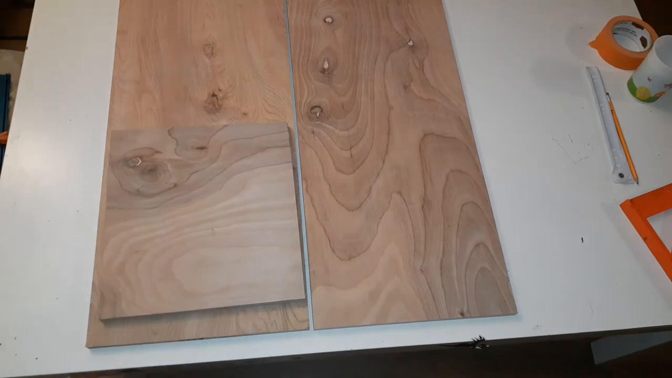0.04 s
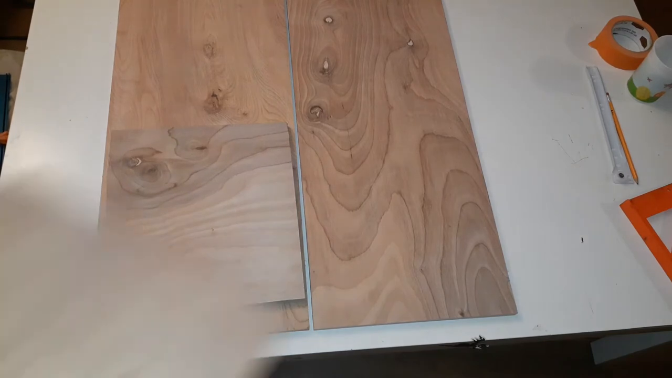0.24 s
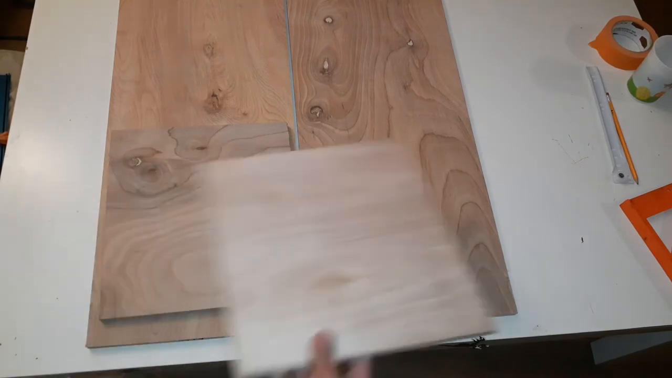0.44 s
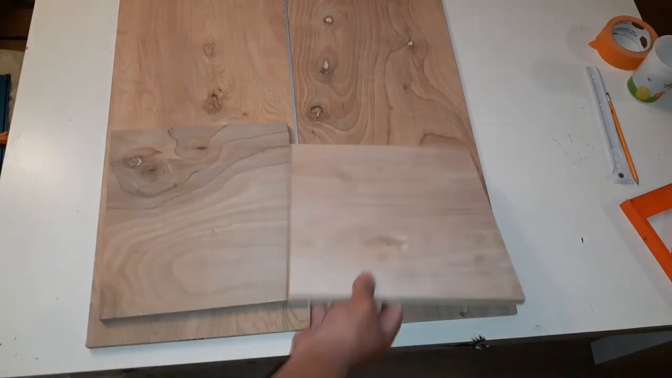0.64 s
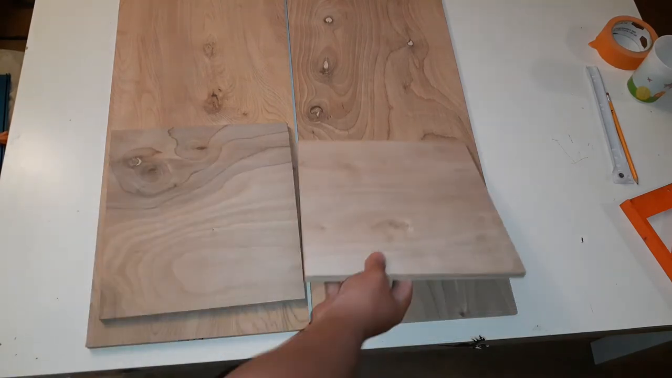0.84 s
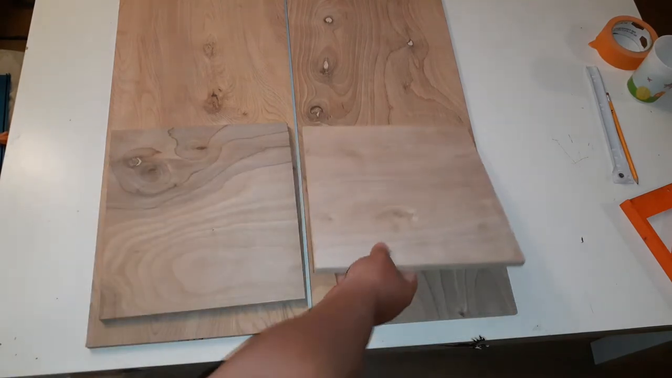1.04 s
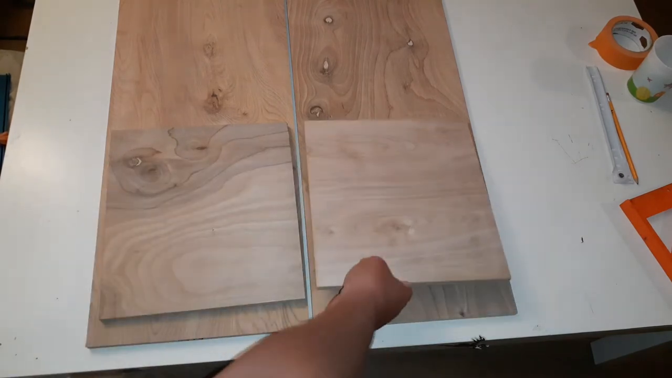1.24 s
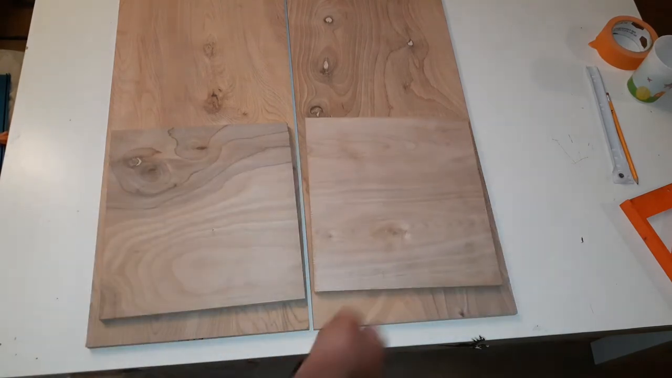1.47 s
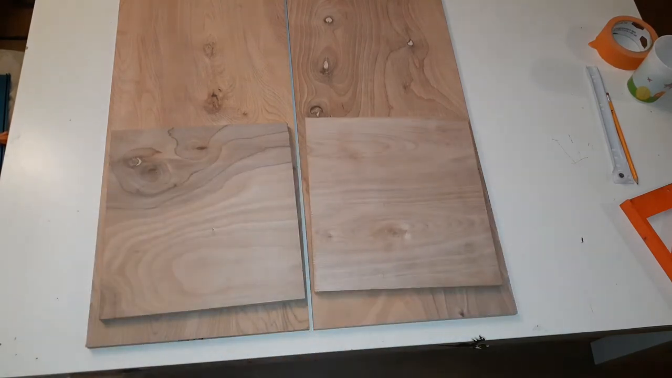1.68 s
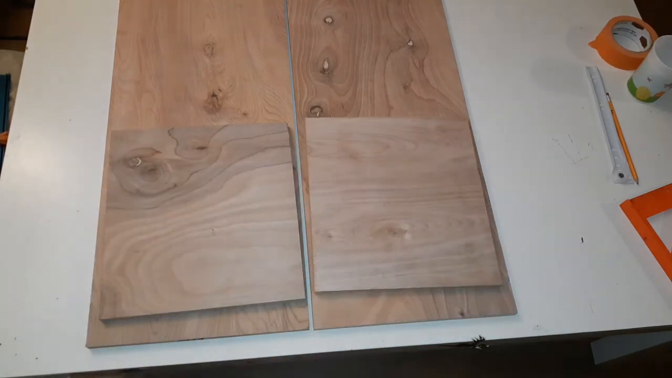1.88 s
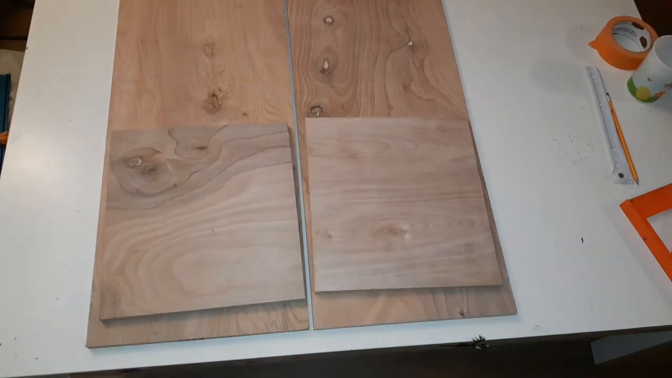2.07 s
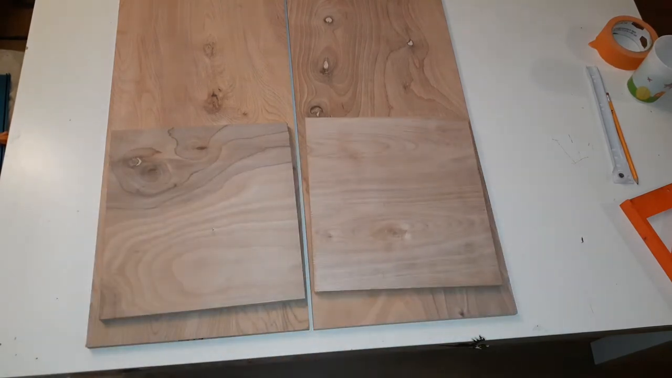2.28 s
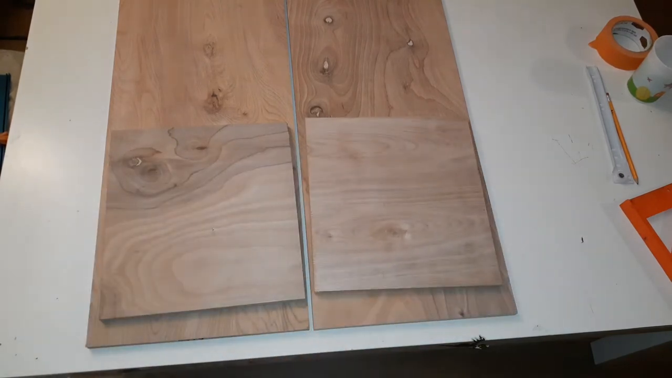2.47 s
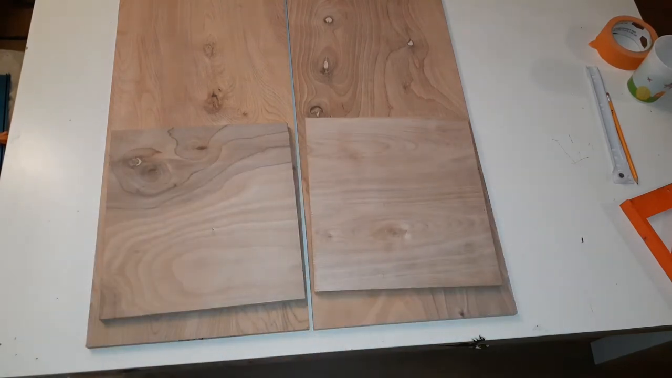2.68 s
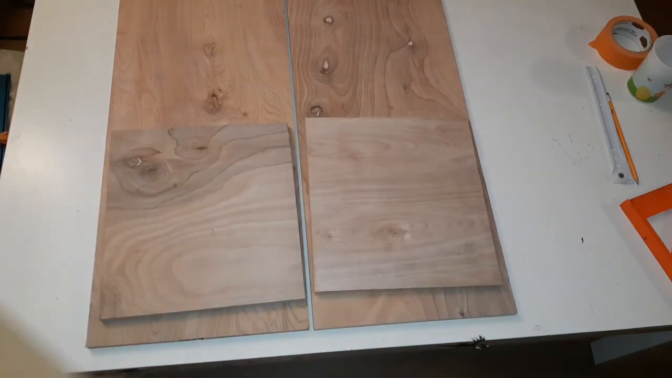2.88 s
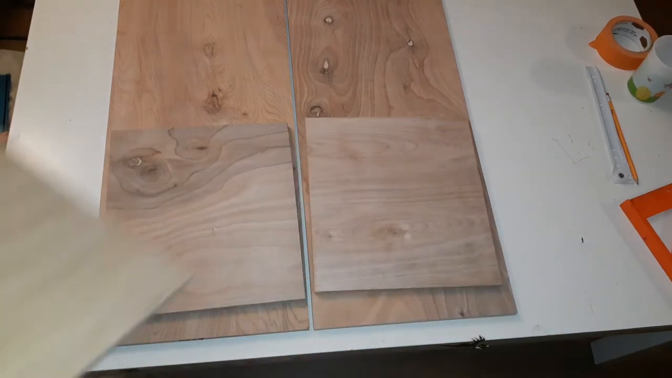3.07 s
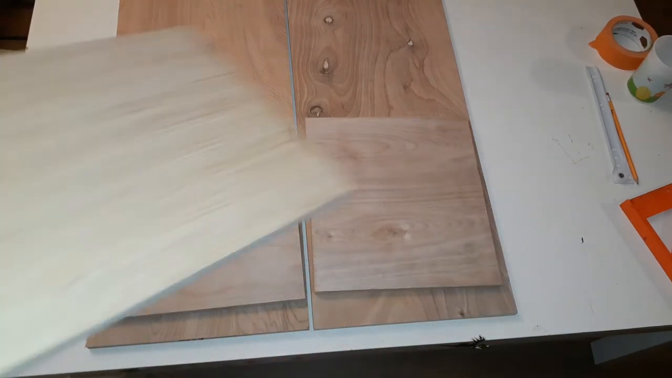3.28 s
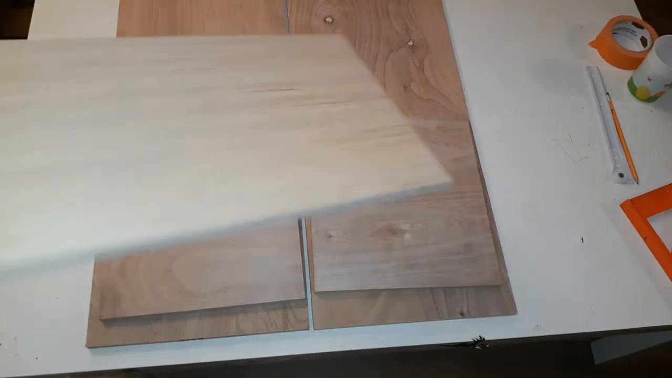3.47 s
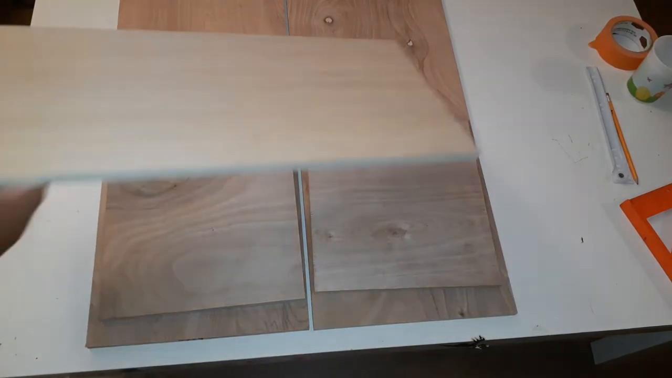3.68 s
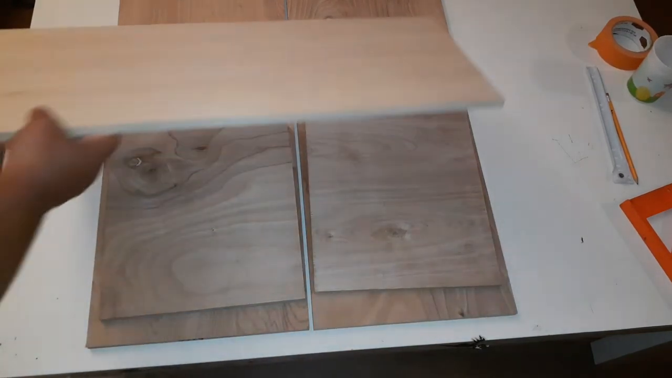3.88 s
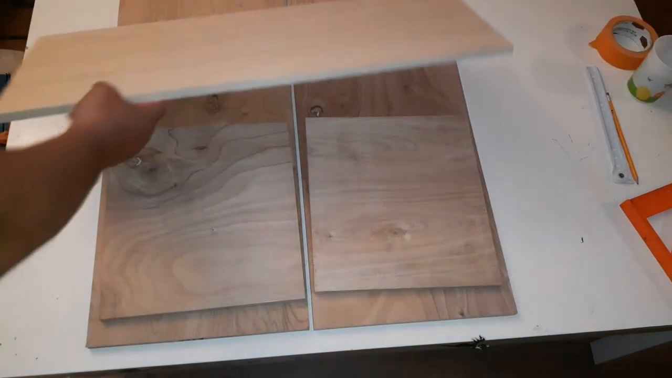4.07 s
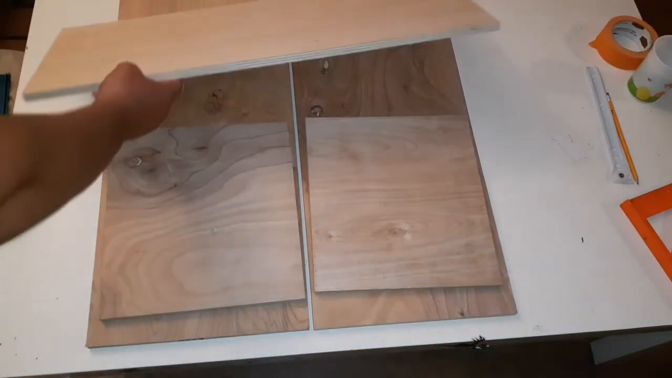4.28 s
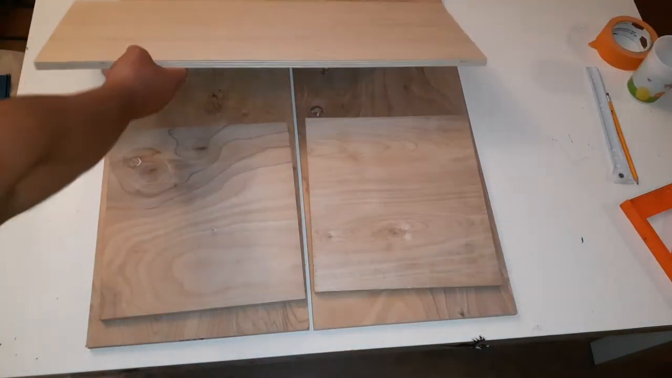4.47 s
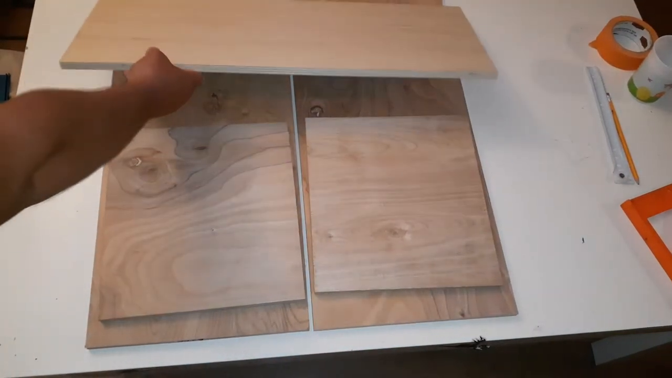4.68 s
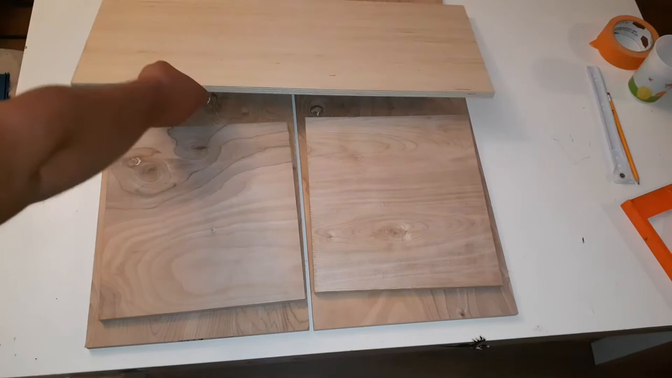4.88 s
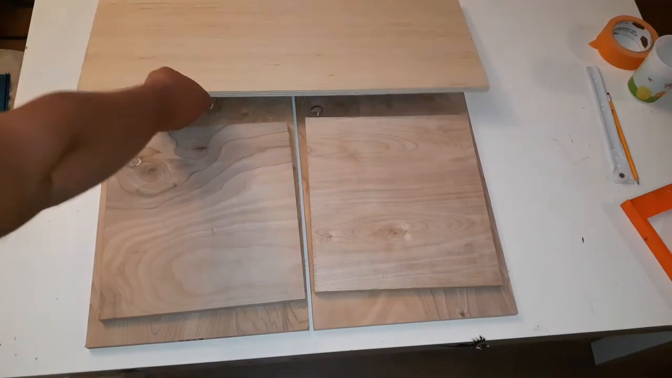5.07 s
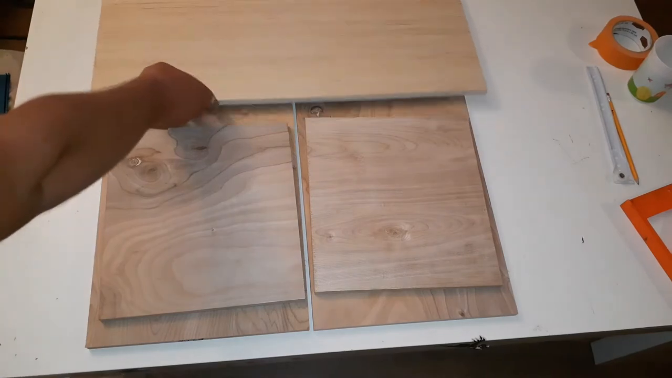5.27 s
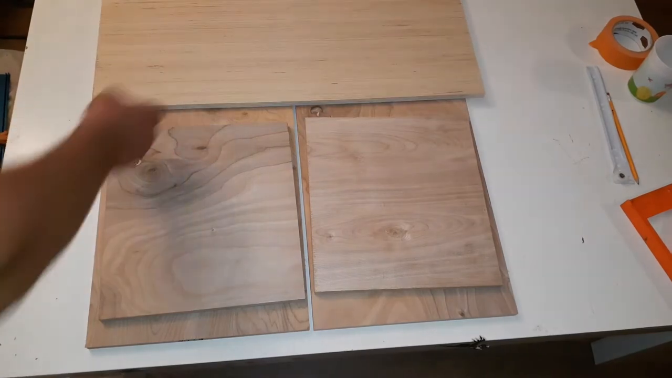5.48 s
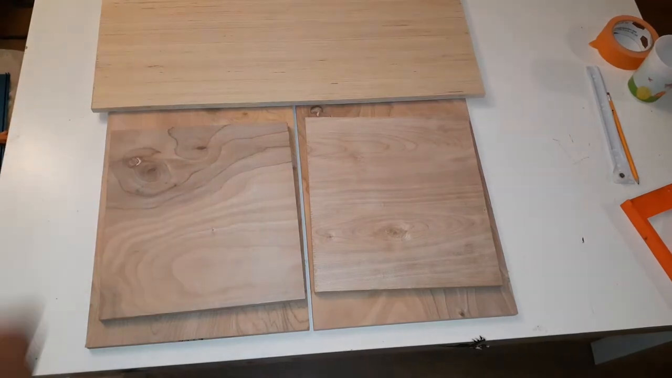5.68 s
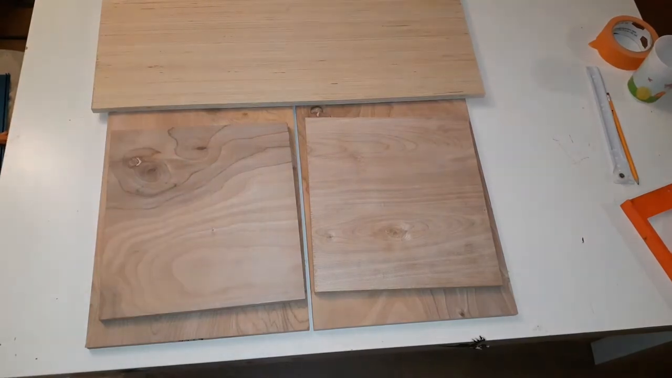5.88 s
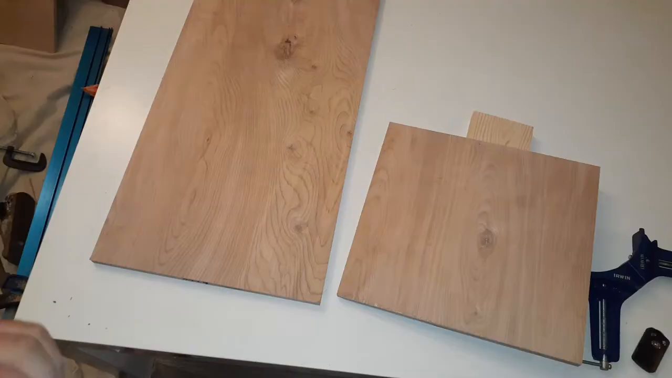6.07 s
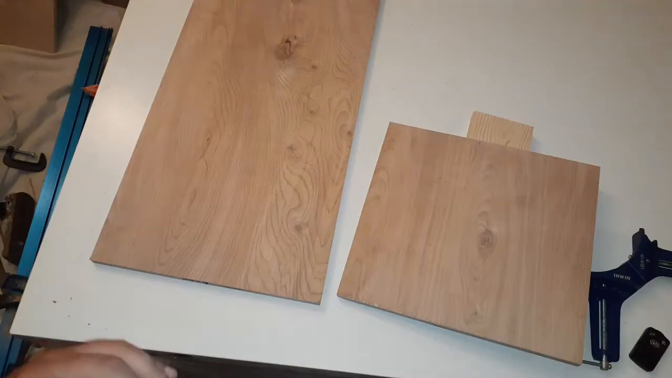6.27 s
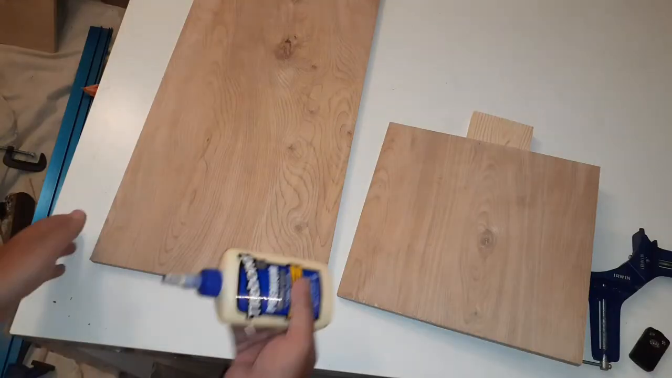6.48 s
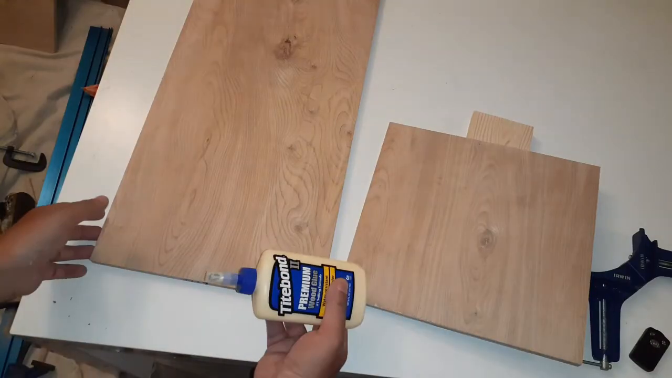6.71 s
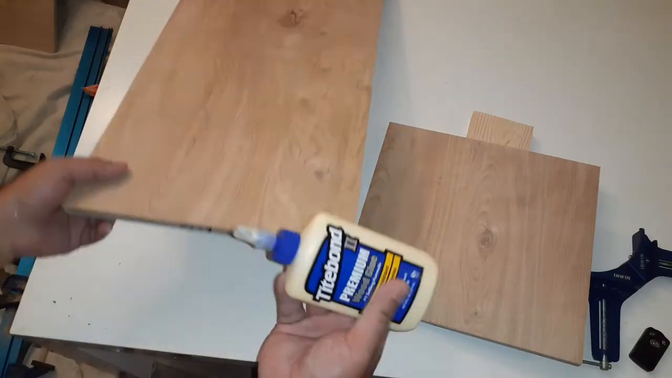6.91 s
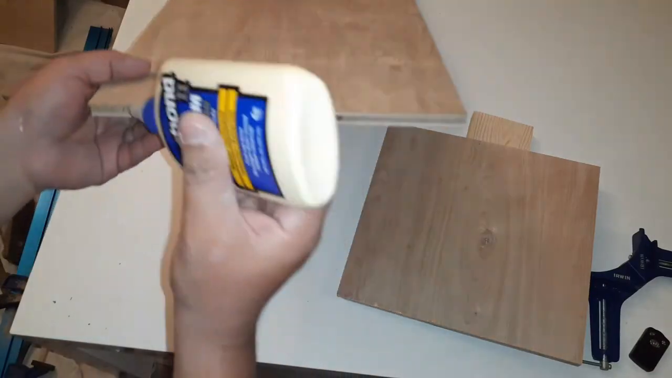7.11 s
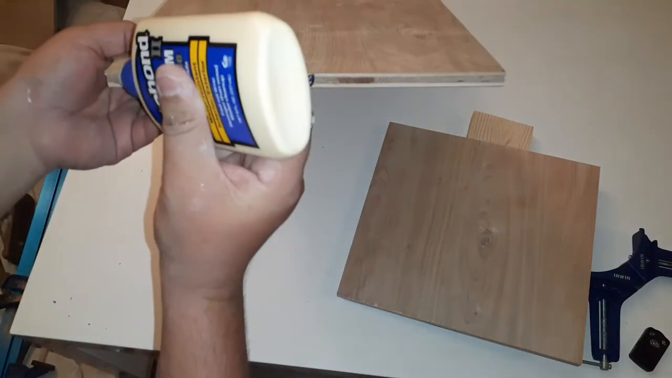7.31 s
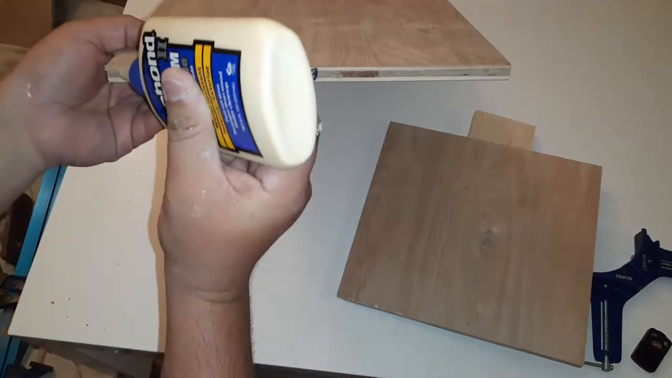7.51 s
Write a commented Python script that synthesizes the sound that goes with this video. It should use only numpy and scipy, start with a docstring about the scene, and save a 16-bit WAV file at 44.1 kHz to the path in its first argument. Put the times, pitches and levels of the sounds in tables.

```python
"""Wooden boards laid on panels on a workbench, close to the microphone, in a small workshop.
A square board clatters down, slides and drops flat; a long plank is fetched, set down, pushed with a
judder and let go; a last panel is knocked and lifted. Blows are noise-driven dense modes plus ringing
sines; slides are jerky noise through board resonances. Behind them: shuffling and rustling noise,
squeaking sines, steady room air, and late on a faint low hum of three sines creeping up in pitch."""
import sys
import numpy as np
from scipy import signal
from scipy.fft import rfft, irfft, next_fast_len
from scipy.io import wavfile

SR = 44100
rng = np.random.default_rng(int(sys.argv[2]) if len(sys.argv) > 2 else 0)


def generate_wav(sig):
    """Save sig (samples, or channels by samples) to the path in sys.argv[1] as 16-bit PCM at SR."""
    pcm = np.round(np.clip(np.atleast_2d(sig).T, -1, 1) * 32767).astype(np.int16)
    wavfile.write(sys.argv[1], SR, pcm)


N = 332822
TIME = np.arange(N) / SR  # s
RING = np.arange(SR // 2) / SR  # s, the longest ring of one blow
TOP_HZ = 15750  # band limit

# Blows of each board; level is the rms of the first 25 ms, thud and edge are gains at 165 and 3000 Hz,
# clack is the favoured band: (t/s, level/dB, thud/dB, edge/dB, clack f/Hz, ring time factor)
SQUARE_HITS = [(.846, -25, -1, 0.5, 505, 1.6), (.873, -23.5, -4.5, 5, 1750, 1.05),
               (.885, -27.5, -7.5, -11, 330, 0.9), (.894, -33.5, -7, -2, 1680, 1),
               (.941, -23, 7, -2.5, 1120, 0.71), (.959, -27, 8, -5, 277, 1.1),
               (1.358, -27.5, 4.5, 5.5, 1110, 0.86), (1.366, -28.5, 5.5, 7.5, 610, 0.83),
               (1.415, -37.5, 6, -2, 327, 0.8)]
PLANK_HITS = [(4.454, -29, 7, -8.5, 424, 0.92), (4.462, -30.5, 4, 2, 540, 0.81),
              (4.644, -22.5, -5, -6, 1417, 1), (4.650, -17.5, 5.5, 0, 400, 0.29),
              (4.694, -20.5, -3.5, -3.5, 1230, 0.73), (4.712, -23, 4.5, -4, 352, 1),
              (5.355, -26.5, -5.5, -4.5, 775, 0.4), (5.383, -33, 1.5, -2.5, 1290, 0.5),
              (5.400, -30.5, 6, -9, 260, 0.31)]
# light bumps of boards being handled, same columns:
# (t/s, level/dB, thud/dB, edge/dB, clack f/Hz, ring time factor)
HANDLING_BUMPS = [(0, -57, -8, -14, 453, 3), (3.017, -50.5, 4.5, -3, 600, 4.1),
                  (3.276, -54, -6, -7, 540, 7.6), (5.138, -46.5, -2, 10.5, 160, 0.88),
                  (6.141, -41, -8.5, 0, 594, 0.57), (6.697, -57.5, -11, 22, 1385, 0.83),
                  (6.788, -49, 4.5, -20, 550, 1.6), (6.908, -33.5, 1, 6, 1140, 1.06)]
# ringing main modes, before each blow's own spread and ring factor: (f/Hz, level/dB, t60/s)
SQUARE_MODES = [(177, -5, 0.11), (245.9, -4.5, 0.33), (294.4, -5, 0.22), (340.7, -2, 0.12), (453, -5, 0.15),
                (706, -2, 0.099), (877, -6, 0.17), (1050.4, 5.5, 0.065), (1566, -8, 0.087),
                (2300, -11.5, 0.11), (2980, -20.5, 0.11)]
PLANK_MODES = [(160, 2.5, 0.12), (246.5, -7.5, 0.49), (291, -6, 0.3), (337.6, -15.5, 0.4), (411, 0, 0.1),
               (458, 1.5, 0.078), (644.6, -11.5, 0.31), (1041, -5.5, .1), (1246, -15.5, 0.14),
               (1612, -10, 0.14), (1730, -8.5, 0.11), (2955, -16, 0.077)]
PANEL_MODES = [(153, 11.5, 0.07), (281, 0.5, 0.27), (391.5, 1, 0.12), (472, -3, 0.083), (550, 7, 0.034),
               (1120, -4.5, 0.062)]
# colour of each board's dense, quickly damped modes: (f/Hz, relative level per Hz/dB)
SQUARE_BODY = [(40, -39), (300, -4.5), (1030, -0.5), (1800, -7.5), (2800, -16.5), (4600, -22), (6000, -36),
               (7800, -57), (12000, -52.5)]
PLANK_BODY = [(70, -39.5), (150, -7), (240, -3), (450, -1), (850, -3.5), (1800, -8.5), (2400, -18),
              (3100, -19.5), (4500, -28), (7500, -60.5)]
PANEL_BODY = [(60, -21), (200, 13), (600, 11.5), (1200, 6), (2200, -10.5), (4500, -29.5), (7500, -57.5)]
MID_DB = -5  # gain of every blow at 1050 Hz
CLACK_DB, CLACK_WIDTH = 7.5, 1.38  # lift of the favoured band; frequency ratio from centre to edge
CLACK_RISE_S = 0.0014  # a blow spreads through the board
DAMPING_POWER = 0.34  # ring time of the dense modes falls as this power of frequency

# Strokes of wood on wood; release is the time to lose 20 dB.
# the square board skids on its edge, then is pushed home:
# (start t/s, level/dB, attack/s, hold/s, release/s)
SQUARE_SKID = [(.9, -49.5, 0.11, 0.32, 0.075)]
SQUARE_PUSH = [(1.1, -39, 0.2, 0.014, 0.062)]
# the plank scrapes as it is picked up, glides with little weight on it, and is pushed firmly:
# (start t/s, level/dB, attack/s, hold/s, release/s)
PLANK_PICKUP = [(2.377, -44, 0.01, 0.0078, 0.047)]
PLANK_GLIDE = [(4.88, -52, 0.16, 0.14, 0.13)]
PLANK_PUSHES = [(5.14, -30.5, 0.11, 0.058, 0.013)]
# a short scuff on the bench, then the last panel drags in short scuffs as it is lifted:
# (start t/s, level/dB, attack/s, hold/s, release/s)
PANEL_SCUFF = [(6.087, -48, 0.036, 0.017, 0.033)]
PANEL_DRAGS = [(6.85, -47, 0.028, 0.0072, 0.12), (6.99, -50, 0.031, 0.047, 0.057),
               (7.09, -49.5, 0.012, 0.0085, 0.022)]
SPEED_POWER = 1.68  # friction grows as this power of speed
# resonances of the square board's skid and push: (f/Hz, width/Hz, level/dB)
SKID_RUB = [(610, 28, -5), (1092, 45, -5.5)]
SQUARE_RUB = [(1095, 63, -2.5), (1225, 110, -4.5), (1676, 60, -9), (3200, 280, -17.5)]
# resonances of the plank's pick-up scrape, light glide and firm push: (f/Hz, width/Hz, level/dB)
PICKUP_RUB = [(503, 170, 21), (900, 1450, 9), (1900, 680, 12.5), (3070, 840, 3.5)]
GLIDE_RUB = [(655, 260, -11.5), (1730, 110, -6), (3010, 220, -14.5)]
PLANK_RUB = [(524, 150, -24), (630.5, 44, -1), (1050, 37, -14.5), (1631, 74, -8.5), (2294, 67, -20.5),
             (2885, 90, -13), (4310, 54, -21.5)]
# resonances of the bench scuff and of the dragging panel: (f/Hz, width/Hz, level/dB)
SCUFF_RUB = [(540, 49, -7), (1120, 50, -9.5), (4060, 1100, -32.5)]
PANEL_RUB = [(383, 19, 3.5), (537, 67, -2.5), (3070, 1000, -29.5)]
# colour of the gritty hiss of a slide: (f/Hz, relative level per Hz/dB)
GRIT = [(100, 6.5), (700, 3), (2000, 7), (4500, -4), (6000, -15), (7700, -37), (12000, -27), (16000, -38.5)]
# the plank's edge sticks and slips free; level is the rms of the first 10 ms: (t/s, level/dB)
EDGE_CATCHES = [(5.199, -36.5), (5.229, -28.5), (5.242, -27.5), (5.280, -24.5), (5.303, -37)]
SLIP_RISE_S = 0.0041  # the edge takes this long to break free

# bouts of moving about with the boards: (start t/s, level/dB, attack/s, hold/s, release/s)
MOVES = [(0, -61.5, 0.0062, 0.039, .37), (2.32, -56, 0.046, 0.58, 6.1), (6.1, -59, 0.87, 0.36, 0.39)]
# colour of the shuffling, and of the rustle: (f/Hz, relative level per Hz/dB)
SHUFFLE = [(25, -36.5), (80, -1.5), (140, 1.5), (260, -8), (550, -10.5), (1200, -13), (2400, -31.5),
           (6000, -56.5)]
RUSTLE = [(300, -30), (900, -0.5), (1700, 5), (3000, 2.5), (4700, -0.5), (6500, -17), (8000, -36.5),
          (13000, -10.5), (16000, -38)]
# single brushes of palm, sleeve or board face over wood: (t/s, level/dB, half length/s)
BRUSHES = [(.01, -62.5, 0.034), (0.143, -65.5, 0.092), (1.002, -50, 0.072), (2.273, -74.5, 0.038),
           (2.802, -64.5, 0.058), (2.963, -59.5, 0.035), (3.055, -64, 0.11), (3.356, -68, 0.082),
           (3.958, -68, 0.04), (5.51, -65.5, 0.029), (5.924, -70, 0.055), (6.929, -66, 0.056),
           (7.02, -67, 0.06), (7.255, -73, 0.035)]
RUSTLE_DB, RUSTLE_GROWS = -73, 7.3  # sleeves at the briskest moment; how steeply they follow the effort
# fingers squeak on the boards, f being the mean pitch: (t/s, f/Hz, level/dB, half length/s)
SQUEAKS = [(0.19, 2280, -61.5, 0.021), (3.117, 1615, -49.5, 0.012)]

# the hum swells and fades: (start t/s, level/dB, attack/s, hold/s, release/s)
HUM_SWELL = [(5.9, -56.5, 0.68, 0.49, 0.82)]
# harmonics of the hum: (multiple of the fundamental, mean level/dB)
HUM_ORDERS = [(1, -9), (2, 0), (3, -4.5)]
HUM_START_HZ, HUM_RISE_HZ_PER_S = 95.6, 4.1
# colour of the still room: (f/Hz, relative level per Hz/dB)
AIR = [(25, -28), (50, -15.5), (84, -4.5), (130, -11), (180, -12.5), (400, -24.5), (680, -18), (950, -16),
       (1530, -29.5), (2850, -42.5), (7500, -54), (12500, -45.5)]

# reverberation of the small workshop: (f/Hz, t60/s)
WORKSHOP = [(100, 0.27), (260, 0.29), (700, 0.31), (1840, 0.38), (4850, 0.36)]
# likeness of left and right in the room, and straight from a struck board: (f/Hz, correlation)
ROOM_ALIKE = [(150, 0.91), (330, 0.83), (700, 0.19), (1400, -0.04)]
KNOCK_ALIKE = [(240, 0.95), (950, 0.37), (3770, 0.06)]
# the boards beam their treble past the microphone: (f/Hz, level/dB)
OFF_AXIS = [(1500, 0.5), (4000, -5.5)]
# stereo balance at the microphone: (f/Hz, left minus right level/dB)
BALANCE = [(150, -3.5), (1290, -3.5), (4400, -5), (8000, 1), (15000, -1)]


def square_board():
    """It clatters down on its far edge, skids, is pushed into place and drops flat."""
    blows = knocks(SQUARE_HITS, SQUARE_MODES, SQUARE_BODY,
                   ring_db=0.0, crack_db=-10.5, clack_t60=0.032, wet_db=-3.5)
    skid = slide(strokes(SQUARE_SKID), SKID_RUB, grit_db=-23.5, spiky_db=3.5, uneven_db=3.0, wet_db=-0.5)
    push = slide(strokes(SQUARE_PUSH), SQUARE_RUB, grit_db=-20.5, spiky_db=4.0, uneven_db=2.5, wet_db=-2)
    return blows + skid + push


def plank():
    """It scrapes as it is picked up, touches, lands and bounces, glides, judders forward and is let go."""
    pickup = slide(strokes(PLANK_PICKUP), PICKUP_RUB, grit_db=-30, spiky_db=3.5, uneven_db=2.5, wet_db=0)
    blows = knocks(PLANK_HITS, PLANK_MODES, PLANK_BODY,
                   ring_db=2.0, crack_db=2.0, clack_t60=0.031, wet_db=-0.5)
    glide = slide(strokes(PLANK_GLIDE), GLIDE_RUB, grit_db=-19, spiky_db=3.5, uneven_db=2.0, wet_db=-5.5)
    push = slide(strokes(PLANK_PUSHES), PLANK_RUB, grit_db=-22.0, spiky_db=2.0, uneven_db=1.0, wet_db=-4.5)
    return pickup + blows + glide + push + catches()


def catches():
    """Each slip of the edge gives the plank's rubbing resonances a short, sharp ring."""
    out = np.zeros((2, N))
    hz, width, peak_db = np.transpose(PLANK_RUB)[:, :, None]
    # a wider resonance starts stronger and dies sooner
    decay = amp(peak_db) * width * np.exp(-np.pi * width * RING)
    fade = decay * (1 - np.exp(-RING / SLIP_RISE_S))
    for s, db in EDGE_CATCHES:
        start_cycles = rng.random(hz.shape)
        ring = np.sum(fade * np.sin(2 * np.pi * (hz * RING + start_cycles)), axis=0)
        slip = in_room(np.array([ring, ring]), wet_db=-4)
        onset_level = np.std(slip[:, :SR // 100])
        out[:, round(s * SR):][:, :len(RING)] += amp(db) * slip / onset_level
    return out


def panel():
    """Light bumps; the last panel scuffs the bench, then drags briefly as it is lifted."""
    bumps = knocks(HANDLING_BUMPS, PANEL_MODES, PANEL_BODY,
                   ring_db=3.0, crack_db=-10.5, clack_t60=0.071, wet_db=-16.5)
    scuff = slide(strokes(PANEL_SCUFF), SCUFF_RUB, grit_db=-26.5, spiky_db=-2, uneven_db=-3.0, wet_db=-36)
    drags = slide(strokes(PANEL_DRAGS), PANEL_RUB, grit_db=-24.0, spiky_db=7.5, uneven_db=4.5, wet_db=-7.0)
    return bumps + scuff + drags


def knocks(hits, modes, body, ring_db, crack_db, clack_t60, wet_db):
    """Each blow is a crack and a clack of dense modes, while the board's main modes ring on."""
    out = np.zeros((2, N + len(RING)))
    hz, mode_db, t60 = np.transpose(modes)[:, :, None]
    tones = amp(mode_db) * np.sin(2 * np.pi * hz * RING)
    dense = dense_modes(clack_t60)
    for s, db, thud_db, edge_db, clack_hz, sustain in hits:
        # the point of contact sets each mode's strength and sign; a pressing hand shortens the ring
        strength = amp(0.68 * rng.standard_normal(len(hz))) * rng.choice([-1, 1], len(hz))
        ring = strength @ (tones * amp(-60 * RING / (t60 * sustain)))
        # a board radiates little deep bass, and the contact is too soft for high treble
        ring = coloured(ring, [(40, -21.0), (100, -6.5), (145, -2.5), (3500, -6.0), (7500, -16.0)])
        clack = rng.standard_normal((2, len(dense))) @ dense
        clack = np.pad(clack, [(0, 0), (0, len(RING) - dense.shape[1])])
        clack = unit(diffuse(clack, KNOCK_ALIKE) * (1 - np.exp(-RING / CLACK_RISE_S)))
        crack = amp(crack_db) * unit(RING == 0)  # a single click
        blow = unit(coloured(clack + crack, body)) + amp(ring_db) * unit(ring)
        # a flat landing thuds, a corner sounds bright, and each spot favours one band of modes
        tone = [(165, thud_db), (280, 0.002), (620, 0.013), (1050, MID_DB), (3000, edge_db)]
        spot = [(clack_hz / CLACK_WIDTH, 0), (clack_hz, CLACK_DB), (clack_hz * CLACK_WIDTH, 0)]
        blow = in_room(coloured(coloured(blow, tone), spot), wet_db)
        onset_level = np.sqrt(np.mean(blow[:, :SR // 40] ** 2))
        out[:, round(s * SR):][:, :len(RING)] += amp(db) * blow / onset_level
    return out[:, :N]


def dense_modes(t60, count=400):
    """A board's closely spaced modes, one per row; t60 holds at 1 kHz, higher ones die sooner."""
    hz = (np.arange(count) + 1 + rng.random(count))[:, None] * TOP_HZ / count
    life = t60 * (1000 / hz) ** DAMPING_POWER
    t = RING[:len(RING) // 2]
    return np.sin(2 * np.pi * hz * t) * amp(-60 * t / life) / np.sqrt(life)


def slide(force, resonances, grit_db, spiky_db, uneven_db, wet_db):
    """Wood fibres slip in tiny uneven jerks that excite the board's resonances."""
    start = np.argmax(force > 0)
    stroke = force[start:start + SR]  # one second at most
    n = len(stroke)
    raw_slips = diffuse(rng.standard_normal((2, n)))
    jerks_db = spiky_db * wobble(900, size=n) + uneven_db * wobble(70, size=n)
    slips = unit(raw_slips * amp(jerks_db))

    def wood(f):
        """Resonances side by side, with alternating sign."""
        total = 0
        for k, (centre, width, db) in enumerate(resonances):
            damping = 1j * f * width
            total = total + (-1) ** k * amp(db) * damping / (centre ** 2 - f ** 2 + damping)
        return total

    def groan(x):
        """Wood damps the highest modes."""
        return coloured(filtered(x, wood), [(4500, 5), (7500, -36.5)])

    # the hiss weakens a little less than the resonances as the stroke lightens
    graze = stroke.max() * (stroke / stroke.max()) ** 0.93
    rub = groan(slips * stroke) + amp(grit_db) * coloured(slips * graze, GRIT)
    sound = in_room(rub / np.std(groan(slips)), wet_db) / np.hypot(1, amp(wet_db))
    return np.pad(sound, [(0, 0), (start, N - start - n)])


def strokes(rows):
    """Gain per sample of hand movements: each gathers speed evenly, holds and dies away."""
    power = np.zeros(N)
    for s, db, attack, hold, release in rows:
        speed = np.clip((TIME - s) / attack, 0, 1)
        braking = np.maximum(TIME - s - attack - hold, 0) / release
        gain = amp(db - 20 * np.minimum(braking, 10)) * speed ** SPEED_POWER
        power += gain ** 2
    return np.sqrt(power)


def handling():
    """Dull shuffling, dry brushing of skin on wood, and small squeaks."""
    effort = strokes(MOVES)
    shuffle = effort * noise(SHUFFLE) * amp(0.92 * wobble(29))
    sleeves = amp(RUSTLE_DB) * (effort / effort.max()) ** RUSTLE_GROWS
    brush_power = sum((amp(db) * swell(s, half)) ** 2 for s, db, half in BRUSHES)
    pressure = np.sqrt(sleeves ** 2 + brush_power)
    rustle = pressure * noise(RUSTLE) * amp(1.7 * wobble(200))
    waver = np.cumsum(1 + 0.0218 * wobble(180)) / SR  # unsteady time makes the pitch waver
    squeak = np.zeros(N)
    for s, hz, db, half in SQUEAKS:
        squeak += amp(db) * swell(s, half) * np.sin(2 * np.pi * hz * waver)
    return shuffle + rustle + in_room(squeak[None], wet_db=-7)


def swell(s, half):
    """A bell-shaped rise and fall around a moment."""
    return np.exp(-np.minimum(((TIME - s) / half) ** 2, 20))


def background():
    """Steady room air, and a faint hum of harmonics that slowly rises in pitch."""
    hz = HUM_START_HZ + HUM_RISE_HZ_PER_S * (TIME - HUM_SWELL[0][0])
    phase = 2 * np.pi * np.cumsum(hz * (1 + 0.0069 * wobble(11))) / SR
    hum = np.zeros(N)
    for k, db in HUM_ORDERS:
        hum += amp(db + 2.8 * wobble(2.466)) * np.sin(round(k) * phase)
    return amp(-63.0) * noise(AIR) + strokes(HUM_SWELL) * hum


def in_room(pair, wet_db, build=0.0061):
    """The direct sound, and the workshop's answer building up behind it (time constant build, s)."""
    hz, t, z = signal.stft(rng.standard_normal((2, len(RING))), SR, nperseg=256)
    decay = amp(-60 * t / along(WORKSHOP, hz)[:, None]) * (1 - np.exp(-t / build))
    tail = diffuse(signal.istft(z * decay, SR, nperseg=256)[1])
    wet = signal.fftconvolve(pair[:1], tail / np.linalg.norm(tail[0]), axes=1)
    return coloured(pair, OFF_AXIS) + amp(wet_db) * wet[:, :pair.shape[1]]


def noise(spectrum):
    """Stereo noise of rms 1."""
    return unit(diffuse(coloured(rng.standard_normal((2, N)), spectrum)))


def diffuse(pair, alike=ROOM_ALIKE):
    """Two unrelated signals become a sound field: alike in the bass, unrelated in the treble."""
    def mid_side(hz):
        turn = np.arccos(np.clip(along(alike, hz), -1, 1)) / 2
        return np.array([np.cos(turn), np.sin(turn)])
    mid, side = filtered(pair, mid_side)
    return np.array([mid + side, mid - side])


def coloured(x, points):
    """x through the causal (minimum-phase) filter with these (f/Hz, level/dB) points."""
    def response(hz):
        cepstrum = irfft(np.log(amp(along(points, hz))))
        # folding the cepstrum forward in time makes the filter causal
        cepstrum[1:len(cepstrum) // 2] *= 2
        cepstrum[len(cepstrum) // 2 + 1:] = 0
        return np.exp(rfft(cepstrum))
    return filtered(x, response)


def filtered(x, response):
    """x times a complex response of frequency."""
    m = next_fast_len(x.shape[-1] + SR // 4, real=True)
    spectrum = rfft(x, m) * response(np.fft.rfftfreq(m, 1 / SR))
    return irfft(spectrum, m)[..., :x.shape[-1]]


def wobble(rate, size=N):
    """A smooth random curve, rate knots a second."""
    knots = rng.standard_normal(int(size * rate / SR) + 4)
    fine = signal.resample(knots, 10 * len(knots))
    return np.interp(np.arange(size) * 10 * rate / SR, np.arange(len(fine)), fine)


def along(points, hz):
    """(f/Hz, value) points read on a log frequency axis."""
    f, v = np.transpose(points)
    return np.interp(np.log(hz + 1), np.log(f + 1), v)


def unit(x):
    """Scaled to rms 1."""
    return x / np.sqrt(np.mean(x ** 2) + 1e-20)


def amp(db):
    """Decibels to gain."""
    return 10 ** (np.asarray(db) / 20)


def scene():
    """The whole bench at the microphone, louder on the right up to about 7 kHz."""
    bench = square_board() + plank() + panel() + handling() + background()
    return filtered(bench, lambda hz: amp(np.outer([.5, -.5], along(BALANCE, hz))))


def record(dry):
    """The level dips briefly near 6.08 s; nothing passes above the band limit."""
    dip_db = np.interp(TIME, [6.057, 6.063, 6.097, 6.103], [0, -24, -24, 0])
    return filtered(dry * amp(dip_db), lambda hz: hz < TOP_HZ)


dry = scene()
out = record(dry)
generate_wav(out)
```